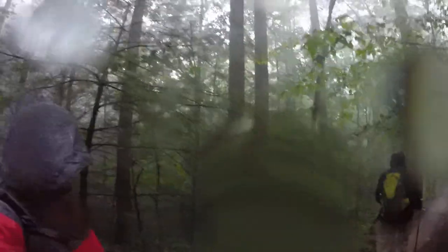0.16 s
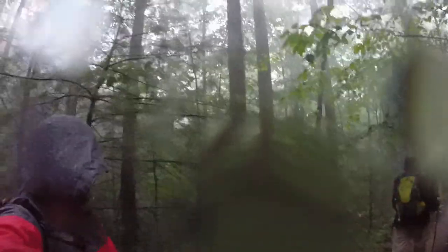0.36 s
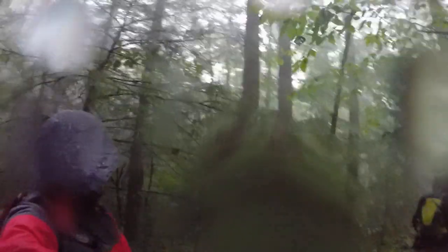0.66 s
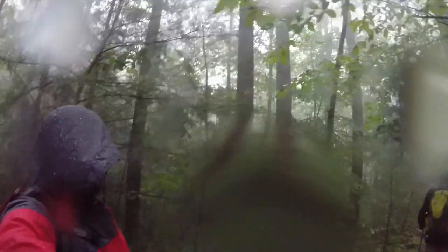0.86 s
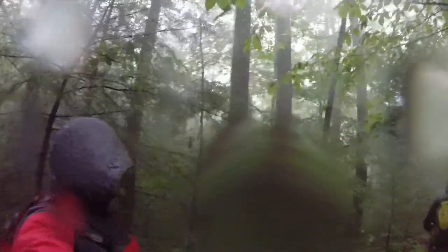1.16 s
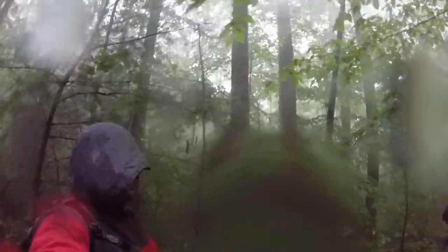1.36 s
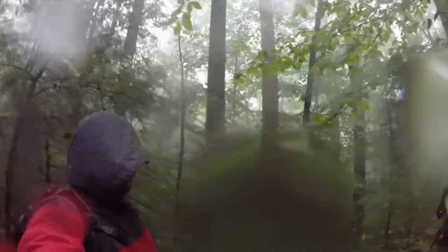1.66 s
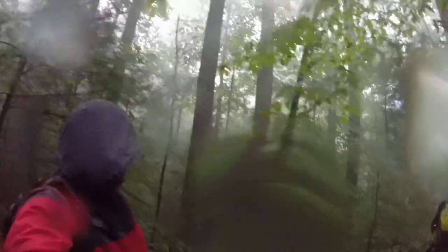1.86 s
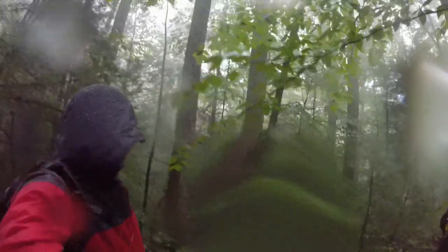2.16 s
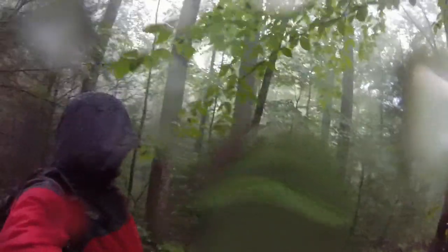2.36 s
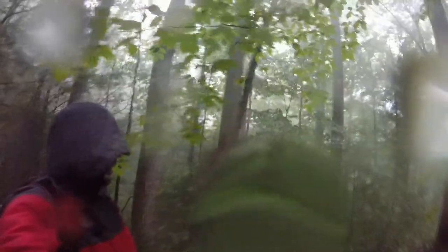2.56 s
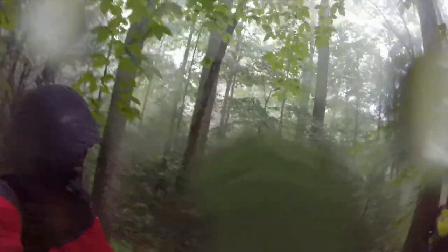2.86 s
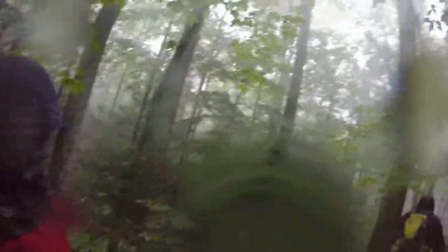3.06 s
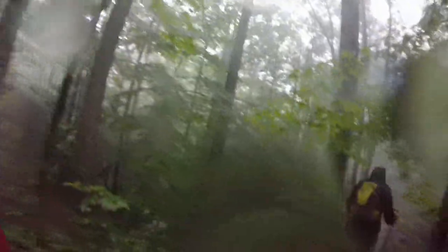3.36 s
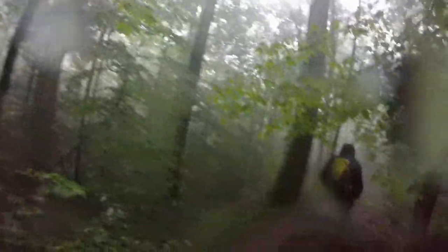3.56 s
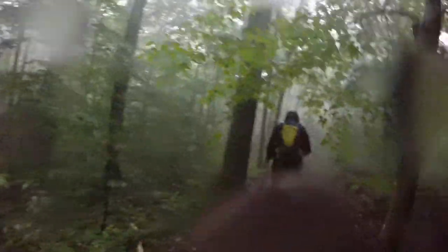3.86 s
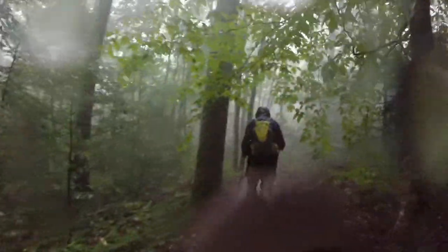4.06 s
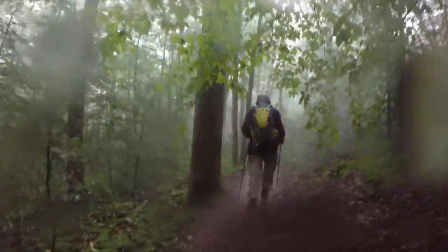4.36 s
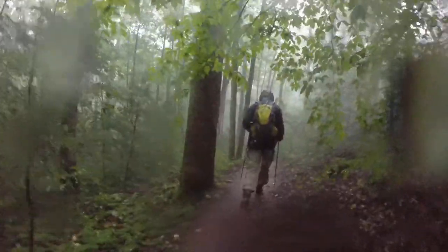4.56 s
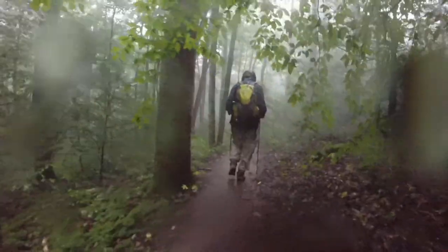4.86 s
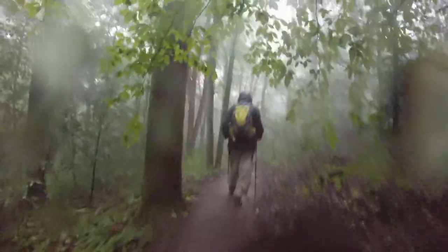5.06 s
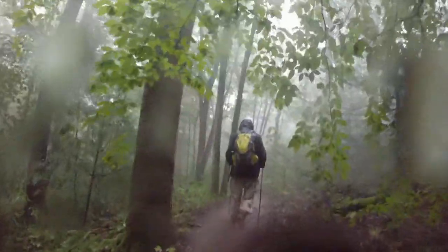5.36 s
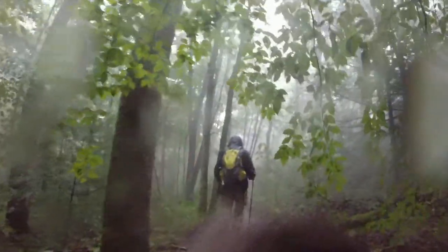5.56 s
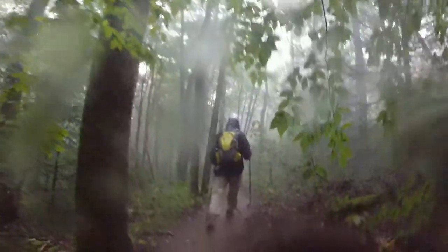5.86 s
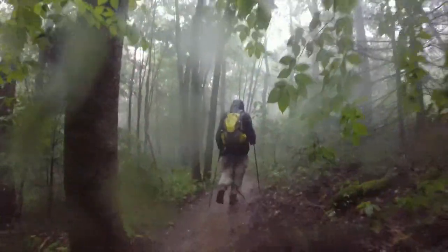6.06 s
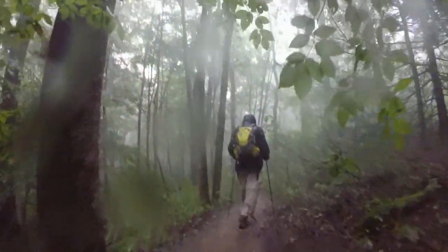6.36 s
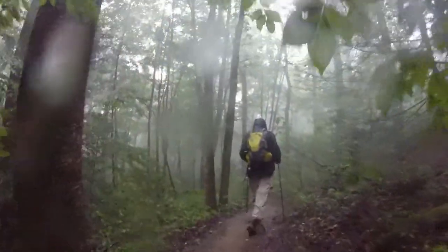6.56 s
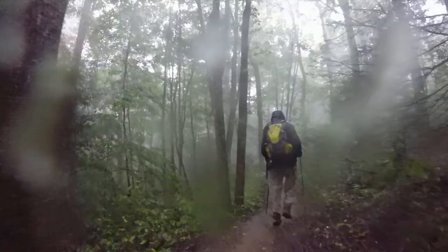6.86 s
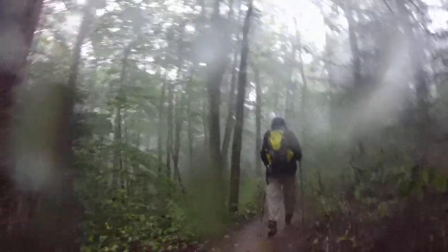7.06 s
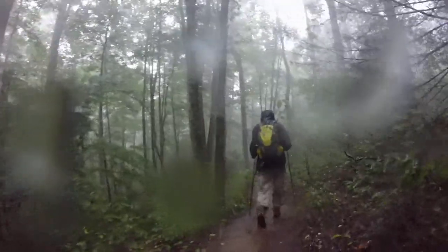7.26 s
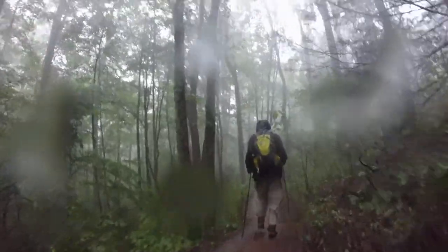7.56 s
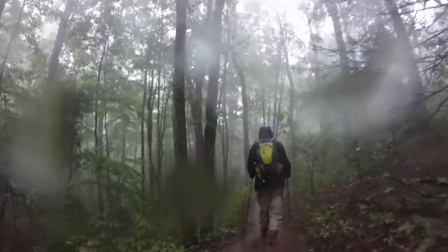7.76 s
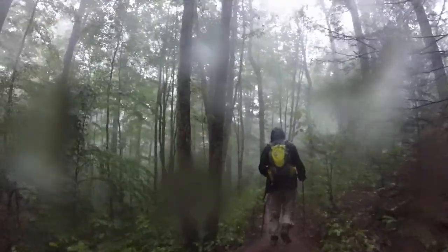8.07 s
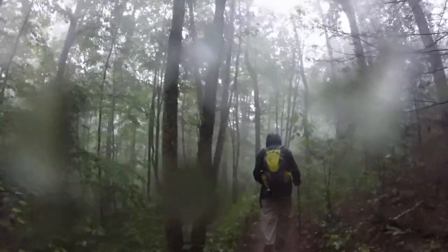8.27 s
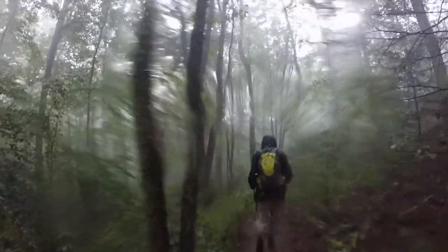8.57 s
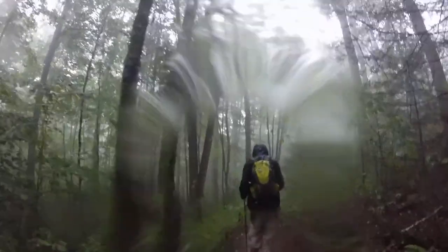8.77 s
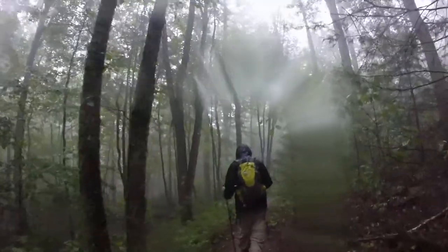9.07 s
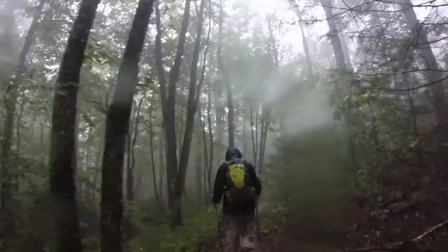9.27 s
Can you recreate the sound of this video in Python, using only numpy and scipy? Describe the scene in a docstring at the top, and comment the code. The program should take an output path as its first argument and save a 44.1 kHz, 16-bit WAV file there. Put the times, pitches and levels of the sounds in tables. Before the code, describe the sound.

Raindrops tap sharply and irregularly on a camera housing over a soft hiss of forest rain, with occasional low thuds.

```python
"""A forest trail in steady rain, heard from inside the sealed housing of a camera being carried along.
Drops splash on the housing and make it ring; knocks through the grip and puffs of wind shake it low down.
Far-off leaves hiss, nearer ones patter, and a small metal part tinkles faintly.
The camera's automatic volume control ducks under each heavy drop and creeps back up."""
import sys
import numpy as np
from scipy import signal
from scipy.fft import rfft, irfft
from scipy.io import wavfile
from scipy.ndimage import uniform_filter1d

SR = 44100
rng = np.random.default_rng(int(sys.argv[2]) if len(sys.argv) > 2 else 0)


def pcm_store(signal):
    """Save signal as 16-bit PCM."""
    levels = np.round(np.clip(np.atleast_2d(signal), -1, 1) * 32767)
    wavfile.write(sys.argv[1], SR, levels.astype(np.int16).T)


N = 415422

# The clearest drops; bass and brightness are set against the middle band:
# (time [s], peak level [dB], splash length [ms], bass [dB], brightness [dB])
CLEAR_DROPS = [(0.06, -23.5, 1.1, 6, 4), (0.0839, -18, 1.6, -5, 5), (0.089, 2, 0.79, -43, 2.5),
               (0.1647, -16, 0.48, -28, -1), (0.2848, 11.5, 0.8, -11, 0), (0.32, 23, 1.3, -9, 1.5),
               (0.483, -10, 1.4, 1.5, -17), (0.843, -13, 0.2, -30, -16), (0.903, 4, 0.08, -7, -1.5),
               (1.055, -4.5, 2.1, -33, -31), (1.2515, -22, .68, -18, -8), (1.51, -20, 0.5, -14, 17),
               (1.5168, -14.5, 0.15, -21, -25), (1.564, -20, .57, -21, -6), (1.5925, -21, 0.9, -16, -3.5),
               (1.6447, -19.6, .82, -29, -17), (1.6993, -3.5, 0.79, -11, -2.5),
               (2.1116, -16.5, 0.58, -3, -19), (2.1295, -13, 0.75, -14.5, -7.5), (2.246, -12, .29, -19, -8),
               (2.4625, -17, 1.2, 15, 19), (2.6344, -21, 0.68, -15, 4.5), (2.9716, -17, 0.34, -18, -13),
               (2.9916, -19.5, 1.2, -24, 7.5), (3.0513, -16.5, 0.69, -12, -26),
               (3.2002, -19.5, 0.29, -17, -2), (3.2424, -7, 1.3, -20, -16), (3.3575, -14.5, 0.66, -11, -11),
               (3.3672, -17.5, 0.38, -18, -20), (3.4778, -5.5, .92, -43, -8.5), (3.49, -15, 1.1, -13, -3),
               (3.5121, 2.5, 0.63, -18, -1), (3.644, -17, .5, -10.5, -3), (3.656, -13.5, 3.2, -43, -8),
               (3.8135, -5, 2.2, -13, -6.5), (4.0529, -9, 0.3, -13, 4), (4.0736, -19, 0.35, 0, 5),
               (4.1134, 10.5, 0.053, -9.5, -0.5), (4.148, -11, 1.4, -34, -5), (4.1749, -19, 1.1, -8, 1),
               (4.202, 11, 0.24, -8.5, -8.5), (4.2227, -19.5, .72, -9, -4), (4.2686, -20, .55, -19, -12),
               (4.2975, 9, .2, -23, -3.5), (4.342, -19, .68, -23, -19), (4.3721, -3, 0.87, -9.5, -6),
               (4.3898, -15, .7, -24, -3.5), (4.4012, -7, 0.71, -22, 1), (4.4313, 20.5, 0.88, -8, 6),
               (4.477, -17, .53, -19, -3), (4.5303, -14, .62, -17, -4), (4.554, -11, 1.1, -11, 0.5),
               (4.5983, -7.5, .71, -11, -6), (4.6082, 16, 0.14, -24.5, -3.5), (4.6574, -23, .51, -25, 0),
               (4.701, 2.1, 0.6, -15, -4.5), (4.774, -17, .76, -8, -6), (4.8254, -20, .52, 0, 8),
               (4.8438, -17.5, 1.1, -7, -4), (4.9222, -19.5, 3.6, 2, -4), (4.977, -7, 0.59, -16, 3),
               (4.9913, -15, .48, -29, -2), (4.999, -11.5, .41, -29, 2), (5.1895, -16, .36, -26, -15),
               (5.3886, -6, 2, -22, -14), (5.4515, -4.5, 0.94, -39, 2.5), (5.4575, 2.6, 0.27, -12.5, -11),
               (5.534, -13, 0.76, -24, -6), (5.5955, -6.5, 0.85, -19, -14.5), (5.6195, -17, 2.2, -2, -12),
               (5.6997, -14.5, 0.78, 8, -11), (5.7343, -8, 0.32, -16, -8), (5.745, -12.5, 1.6, -23, -9),
               (5.7713, -4, 0.34, -12, -2.5), (5.787, -13, 0.81, -24, -3), (5.7917, -16, .26, -11, 7),
               (5.8144, -13, 0.65, -13.5, -1), (5.8433, -14, 0.79, -20, -10), (5.8636, 0, 0.59, -23, -3.5),
               (5.876, -21, .61, -5, 0), (5.89, -17, 0.93, -2, -5), (5.907, -23, .47, -10, 1.5),
               (5.9165, -8, 0.22, -8.5, -3), (5.9503, -7, 0.29, -14, -2), (5.9696, -11, 0.27, -7, 2),
               (5.9998, -15, 0.61, -9, 1), (6.0319, -6.5, 2.4, -1, -0.5), (6.043, -6.5, 0.4, -10, 0),
               (6.0567, -17, .38, -22, -7), (6.1026, -13.5, 3.8, -16, -25), (6.1355, -9, 0.26, -10, -0.5),
               (6.1414, -6.5, 0.25, -2, -10), (6.1583, -19, .39, -8, -1), (6.1837, -8.5, 1.9, -14, -6),
               (6.21, 2.5, 0.44, -15, -1), (6.2474, -17, 1.4, -32, -7), (6.3042, -8.5, 0.34, -4.5, -4.5),
               (6.35, -12, .79, -13, -6), (6.355, -8, 1.7, -6, -2), (6.3867, -16.2, 0.9, -17, -11),
               (6.5508, -13, 0.58, -37, -5.5), (6.5565, -14.5, 0.53, -36, -14),
               (6.6081, -3.2, 1.45, -11, -13), (6.639, -16, .39, -26, -18), (6.6905, -9, .24, -28, -8),
               (6.709, -17, .53, -17, -11), (6.717, -12, 1.1, -7, -5.5), (6.774, 3.5, 0.24, -14.5, -17),
               (6.793, -18, .39, -5, -5), (6.831, -14, 1.01, -22, -8), (6.8433, -5, 0.081, -3, -7),
               (6.898, -9, 0.42, -17, 1), (6.9266, -13.5, 0.51, -9, -9), (6.953, -12.5, 0.12, -13, -29),
               (6.965, -11, 0.59, -15, -1), (7.005, 4.5, 0.69, -24.5, -26), (7.0393, -11, 1.3, -22, -12),
               (7.0543, -13.5, 1.36, -26, -20), (7.087, -18.5, .26, -21, 18), (7.2519, -5, 0.49, -25, -9),
               (7.2626, -27, 0.47, -30, -21), (7.319, -3.5, .44, -16, -3.5), (7.372, -18, 0.41, -3, -14),
               (7.44, -14, 1.4, -2.5, -5), (7.454, -30, 2.1, 21, -8), (7.6098, -14.5, 0.28, -24, 5),
               (7.6435, -14, 1.26, -6.5, -6), (7.8471, -9.5, 0.55, -30, 0), (7.8577, -5, 0.29, -7.5, -3.5),
               (7.8715, -8.5, .63, -12, -11), (7.889, -20, .98, -5, -2.5), (7.915, -21, .81, -10, -1.5),
               (7.9722, 20.5, 0.4, -12, -2), (8.058, -19, .41, -13, -7), (8.191, 7.5, 0.43, -18, 0.5),
               (8.1982, 1.2, 0.64, -8, 2), (8.2096, -6, 0.52, -7, 0), (8.2271, -25, .4, -15, 2),
               (8.4794, -17, 1.3, -4, 0), (8.5034, -0.5, .37, -3, -8), (8.5155, -8.5, 0.67, -16, -10),
               (8.558, -2, 0.45, -14.5, 0.5), (8.5983, -16, .36, -14, 0), (8.6665, -13, .38, -20, -5),
               (8.6785, 8, 1, -55, -3.5), (8.839, -7, 1.4, -23.5, -12), (8.9027, -19.5, .66, -12, -8),
               (8.938, -14, .59, -8, -6), (8.9453, -10, 0.57, -1, -5.5), (9.0014, -1.9, 1.6, -18, -2),
               (9.1283, -11.5, 0.92, -29, -11), (9.1366, -4, 1.2, -7.5, -1.5),
               (9.2679, 2.5, 0.87, 2.5, -6.5), (9.2693, 4, 3.6, -13, -6), (9.3191, -2, 0.83, 28, 0),
               (9.3715, -1, 0.36, -46, -8.5), (9.402, -15.9, 0.85, -6, -3)]
# The tones the housing rings with: (pitch [Hz], level [dB], time to fade by 60 dB [s])
HOUSING_TONES = [(425, -4, 0.0012), (630, -4.5, 0.0027), (1505, -6, 0.012), (1890, -34, .11),
                 (1820, -4.5, 0.0067), (2062, -19.5, 0.05), (2258, 15, 0.0026), (2930, 13, 0.0032),
                 (3567, -5.5, 0.0091), (4334, -5.5, 0.0091), (5180, 15.5, 0.0027), (5460, -10, 0.0068),
                 (6100, -19, 0.01), (7790, -11.5, 0.003), (9500, -28, 0.0027)]
# Bass, middle, bright and treble bands; little gets through near 1 kHz: (low edge [Hz], high edge [Hz])
SPLASH_BANDS = [(160, 1002), (1230, 2530), (2550, 4120), (4000, 11200)]


def drops(fade_share=0.7, impact_db=8.0, spray_db=-19.0, spray_ms=3.23, spot_db=2.5, size=4096):
    """Each drop splashes on the housing and makes it ring, a little differently for each spot it hits."""
    times, peak_db, splash_ms, bass_db, bright_db = np.vstack([small_drops(), CLEAR_DROPS]).T
    hz, tone_db, ring_s = np.transpose(HOUSING_TONES)
    noise, spot = np.hsplit(rng.standard_normal((len(times), size + len(hz))), [size])
    ms = np.arange(size) / SR * 1000
    # a sharp impact, the burst of the drop, then fine spray falling back
    impact = undb(impact_db) * (ms == 0)
    burst = np.exp(-ms / (fade_share * splash_ms[:, None]))
    spray = undb(spray_db) * np.exp(-ms / spray_ms)
    splash = impact + noise * (burst + spray)
    swing = (-1) ** np.arange(len(hz))  # neighbouring tones swing in opposite directions
    housing = (undb(tone_db + spot_db * spot) * swing) @ ring(hz, ring_s, size)
    hit = signal.fftconvolve(splash, housing, axes=1)[:, :size]
    treble_db = bright_db - 4.5
    sound = 0
    for (low_hz, high_hz), db in zip(SPLASH_BANDS, [bass_db, 0, bright_db, treble_db]):
        part = band(hit, low_hz, high_hz)
        sound = sound + part * (undb(db) / np.linalg.norm(part, axis=1))[:, None]
    return place(times, sound * (undb(peak_db) / np.abs(sound).max(axis=1))[:, None])


# How thickly small drops fall, most under dripping branches: (time [s], pace [relative])
DRIP_PACE = [(0, 16), (.6, 10), (1, 4), (2.2, 5), (3.5, 8), (4.2, 9), (4.6, 20), (5.2, 8), (5.9, 20),
             (6.5, 17), (7.1, 26), (7.4, 8), (8.2, 6), (9.42, 9)]
# How small drops vary: (average, spread), with one row each for
# peak level [dB], splash length [natural log of ms], bass [dB] and brightness [dB]
SMALL_DROP_TRAITS = [(-22, 2), (-0.15, 0.26), (-18, 6.5), (-9.5, 5.6)]


def small_drops(count=90):
    """Small drops land by chance, more where the pace is high; gives rows like those of CLEAR_DROPS."""
    share = rng.random(count)
    chance = rng.standard_normal((count, len(SMALL_DROP_TRAITS)))
    fallen = np.cumsum(curve(DRIP_PACE))
    times = np.searchsorted(fallen, share * fallen[-1]) / SR
    average, spread = np.transpose(SMALL_DROP_TRAITS)
    peak_db, log_ms, bass_db, bright_db = (average + spread * chance).T
    return np.transpose([times, peak_db, np.exp(log_ms), bass_db, bright_db])


# Pings after hard drops: (time [s], pitch [Hz], starting level [dB], time to fade by 60 dB [s])
DROP_PINGS = [(0.089, 3000, -25, 0.06), (0.323, 1820, -13, 0.16), (.322, 3680, -12, 0.031),
              (4.2985, 2140, 1, 0.016), (4.435, 2950, -4, 0.03), (7.974, 2105, 12, 0.017),
              (7.974, 4350, -20, 0.038)]


def pings(size=8192):
    """A few hard drops leave a clear tone that outlasts the splash."""
    times, hz, level_db, ring_s = np.transpose(DROP_PINGS)
    return place(times, undb(level_db)[:, None] * ring(hz, ring_s, size))


# Knocks through the grip: (time [s], peak level [dB], direction [+1 or -1], push width [ms])
GRIP_KNOCKS = [(0.489, -17.5, -1, 0.56), (1.1903, -30, 1, 1.6), (1.3013, -23, -1, .64),
               (1.4256, -31, 1, 5.4), (1.6863, -28, 1, 0.99), (2.5891, -30.5, -1, 2.7),
               (2.981, -28.5, 1, 0.57), (3.8975, -27.5, -1, .6), (3.9576, -18.5, -1, 0.85),
               (4.3581, -20, -1, 3.1), (4.924, -28.5, -1, 1.14), (5.7034, -32, 1, 0.59),
               (6.031, -21, -1, .66), (6.1464, -9.5, -1, 0.81), (6.1643, -19, 1, 3.1), (6.293, -26, 1, 1.5),
               (7.32, -17.5, 1, 1.14), (7.457, -17.5, 1, 0.52), (7.9355, -32.6, 1, 2.2),
               (8.3747, -22.5, 1, .63), (8.5032, -23, -1, 1.26), (8.737, -29.5, 1, 0.76),
               (8.9324, -18, 1, 1.94), (9.2676, -13.5, 1, 0.76), (9.3204, -24, 1, .44),
               (9.3602, -25.5, -1, .61)]


def knocks(rebound_hz=40, lead_s=0.01, size=4096):
    """Each knock gives the sealed-in air a short, round push, followed by a slow rebound."""
    times, peak_db, direction, push_ms = np.transpose(GRIP_KNOCKS)
    ms = (np.arange(size) / SR - lead_s) * 1000
    push = np.exp(-(ms / push_ms[:, None]) ** 2 / 2)
    thud = band(push, rebound_hz, 760)
    gain = direction * undb(peak_db) / np.abs(thud).max(axis=1)
    return place(times - lead_s, thud * gain[:, None])


# Rain on the leaves: (time [s], level [dB], near patter against far hiss [dB])
LEAF_RAIN = [(0, -39, -6.5), (1, -37.5, -6.5), (2, -38.5, -9), (3, -39, -3.5), (4, -39, -1.5),
             (4.6, -37.5, -19), (5.3, -36, -2), (5.7, -38.5, -4), (6.1, -40.5, 4), (6.5, -37.5, 1.5),
             (7, -46, 2), (7.6, -42, -11.5), (8.2, -36, -5.5), (8.8, -39, -4.5), (9.42, -37, -15)]
# How strong that rain is from low to high pitch: (pitch [Hz], relative level [dB])
LEAF_COLOUR = [(94, -33.5), (160, -9.5), (359, -14.5), (705, -8), (807, -12.5), (1080, -10.5), (1440, -0.5),
               (2520, -3), (3700, -11.5), (4660, -6), (5990, -13), (6850, -21), (12200, -33.5),
               (14800, -41), (16000, -62)]


def rain_on_leaves(hits_per_s=500, uneven_db=4.0, spatter_ms=1.56):
    """Far rain is a smooth hiss; nearer leaves add short spatters of very uneven size."""
    hits = rng.random(N) < hits_per_s / SR
    hit_db = np.minimum(uneven_db * rng.exponential(size=N), 18)
    fade = np.exp(-1000 / (spatter_ms * SR))
    fading_hits = signal.lfilter([1], [1, -fade], hits * undb(hit_db))
    spatters = fading_hits * rng.standard_normal(N)
    hiss = rng.standard_normal(N) * undb(wander(25))  # flickers by about 1 dB
    rain = hiss + undb(curve(LEAF_RAIN, column=2)) * unit(spatters)
    return unit(colour(rain, LEAF_COLOUR)) * undb(curve(LEAF_RAIN))


# The low rumble of the wind: (time [s], level [dB])
WIND_RUMBLE = [(0, -39), (.3, -38.5), (.55, -40.5), (1.12, -41), (1.25, -30.5), (1.5, -38), (1.75, -33),
               (2.2, -41), (3.1, -41.5), (3.6, -33.5), (4, -39.5), (5, -40.5), (5.4, -39), (6.2, -39),
               (7, -47), (7.5, -50.5), (7.85, -43.5), (9.42, -41.5)]


def wind(gust_db=4.5):
    """Air and handling push the housing in slow, uneven puffs."""
    gusts = rng.standard_normal(N) * undb(gust_db * wander(25))
    puffs = band(gusts, 7, 21.2, order=1)
    return unit(band(puffs, 7.8, 133)) * undb(curve(WIND_RUMBLE))


# Faint tinkles of metal: (time [s], lower tone level [dB], upper tone level [dB])
METAL_TINKLES = [(1.22, -62, -58), (1.484, -46, -51), (1.628, -57, -70), (1.845, -56, -56),
                 (1.865, -55, -63), (3.588, -56, -66), (3.95, -58, -51), (6.558, -41, -58),
                 (6.81, -60, -59), (8.152, -51, -46), (8.212, -41, -54)]
# The metal's two tones: (pitch [Hz], time to fade by 60 dB if left to ring [s])
METAL_TONES = [(7120, .2), (10250, .2)]


def tinkles(swell_ms=2.9, stop_ms=35.0, size=4096):
    """A small metal part swells into a brief ring and is quickly hushed again."""
    times, *tone_db = np.transpose(METAL_TINKLES)
    hz, ring_s = np.transpose(METAL_TONES)
    ms = np.arange(size) / SR * 1000
    shape = (1 - np.exp(-ms / swell_ms)) * np.exp(-(ms / stop_ms) ** 4)
    tones = undb(np.transpose(tone_db)) @ ring(hz, ring_s, size)
    return place(times, tones * shape)


def undb(db):
    """Turn decibels into a number to multiply by."""
    return 10 ** (np.asarray(db) / 20)


def unit(x):
    """Scale a sound to an average strength (rms) of 1."""
    return x / np.sqrt(np.mean(x ** 2))


def curve(table, column=1):
    """Join a column's values with straight lines over time."""
    return np.interp(np.arange(N) / SR, *np.transpose(table)[[0, column]])


def band(x, low_hz, high_hz, order=2):
    """Keep the pitches between two edges."""
    return signal.sosfilt(signal.butter(order, [low_hz, high_hz], "band", fs=SR, output="sos"), x)


def colour(x, points, size=2048):
    """Turn each pitch up or down, following (pitch [Hz], level [dB]) points."""
    hz, db = np.transpose(points)
    grid_hz = np.maximum(np.arange(size // 2 + 1) * SR / size, 1)
    gain = undb(np.interp(np.log(grid_hz), np.log(hz), db))
    # fold the filter in time so that it never sounds before its input
    folded = irfft(np.log(gain))
    folded[1:size // 2] *= 2
    folded[size // 2 + 1:] = 0
    return signal.fftconvolve(x, irfft(np.exp(rfft(folded))))[:N]


def wander(per_s):
    """Glide between random values, mostly within -1 to 1."""
    step = int(SR / per_s)
    return uniform_filter1d(np.repeat(rng.standard_normal(N // step + 1), step), step)[:N]


def ring(hz, ring_s, size):
    """Pure tones, one a row, that fade by 60 dB in ring_s."""
    t = np.arange(size) / SR
    return np.sin(2 * np.pi * hz[:, None] * t) * np.exp(-np.log(1000) * t / ring_s[:, None])


def place(times, sounds):
    """Lay one short sound at each time."""
    out = np.zeros(N + sounds.shape[1])
    for time, sound in zip(times, sounds):
        start = int(time * SR)
        out[start:start + len(sound)] += sound
    return out[:N]


def scene():
    """Everything reaches one microphone."""
    return (drops() + knocks() + rain_on_leaves() + wind() + pings() + tinkles())[None]


def record(dry):
    """The loudest peaks are squashed, the volume ducks and creeps back, and the highest treble is cut."""
    overload_db, sharpness, top_hz = 17.5, 13.4, 16300
    ceiling_db, recover_db_per_s, block_s = -0.9, 16, 1024 / 48000
    squashed = dry[0] / (1 + np.abs(dry[0] / undb(overload_db)) ** sharpness) ** (1 / sharpness)
    starts = (np.arange(0, N / SR, block_s) * SR).astype(int)
    peaks_db = 20 * np.log10(np.maximum.reduceat(np.abs(squashed), starts))
    gain_db, now_db = [], 0
    for peak_db in peaks_db:  # each short block's peak must fit under the ceiling
        now_db = min(now_db + recover_db_per_s * block_s, ceiling_db - peak_db, 0)
        gain_db.append(now_db)
    gain = undb(np.repeat(gain_db, np.diff(np.append(starts, N))))
    treble_cut = signal.ellip(10, .2, 85, top_hz, fs=SR, output="sos")
    return signal.sosfilt(treble_cut, squashed * gain)[None]


dry = scene()
out = record(dry)
pcm_store(out)
```